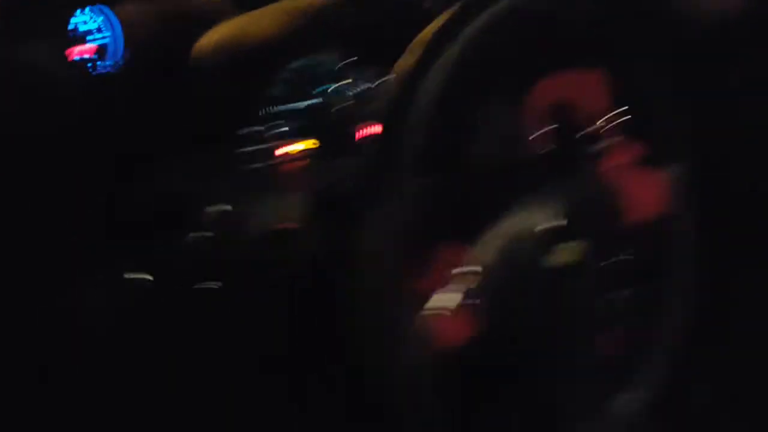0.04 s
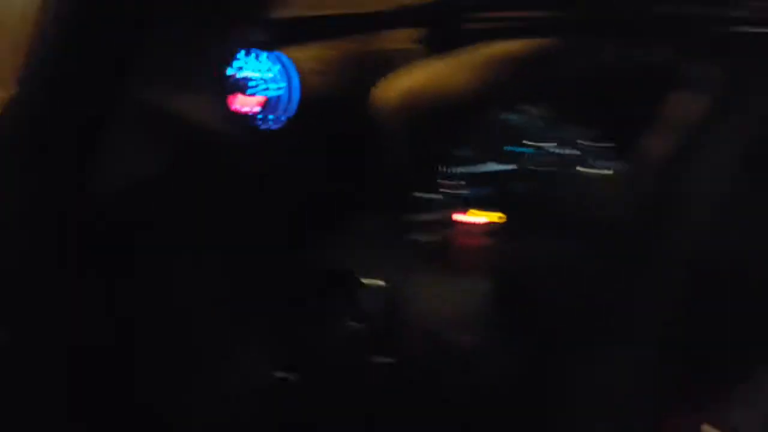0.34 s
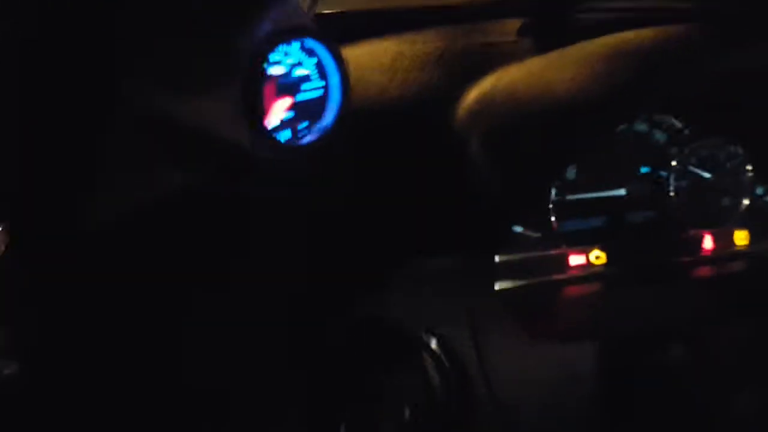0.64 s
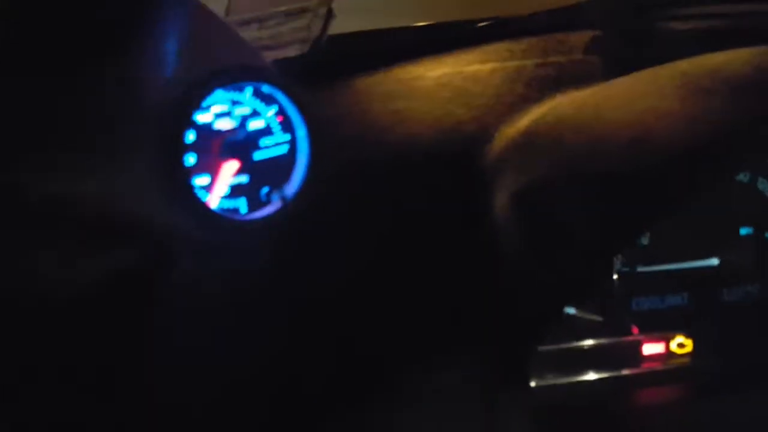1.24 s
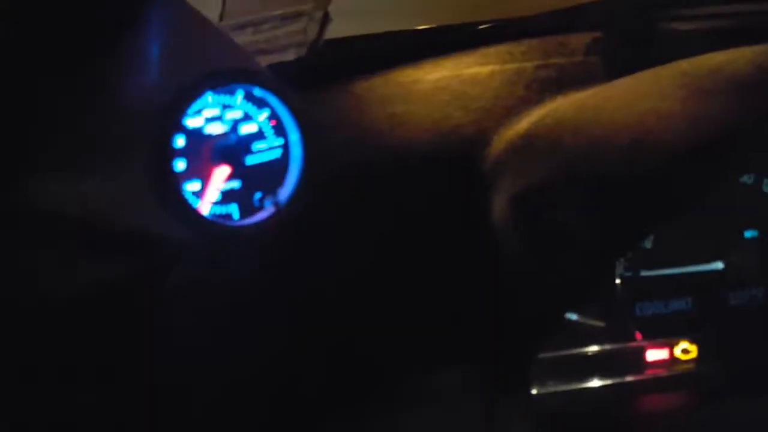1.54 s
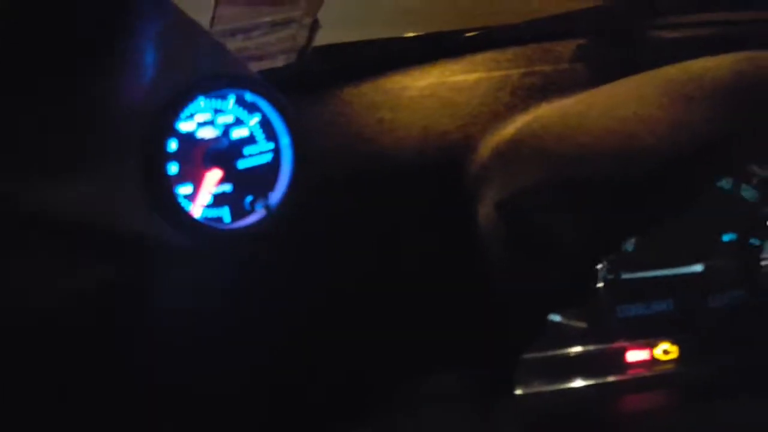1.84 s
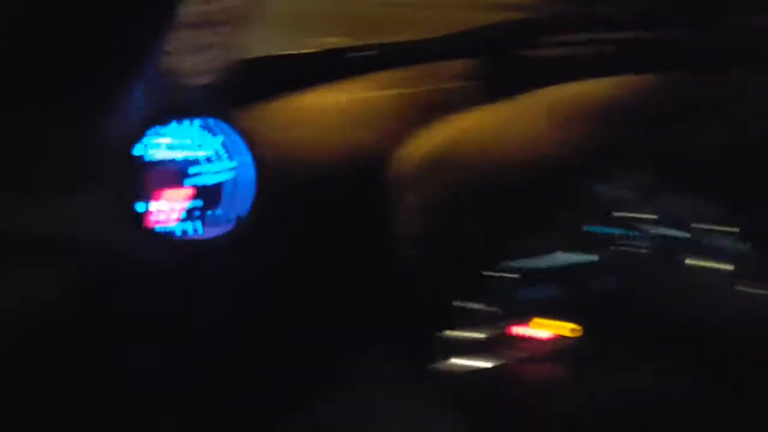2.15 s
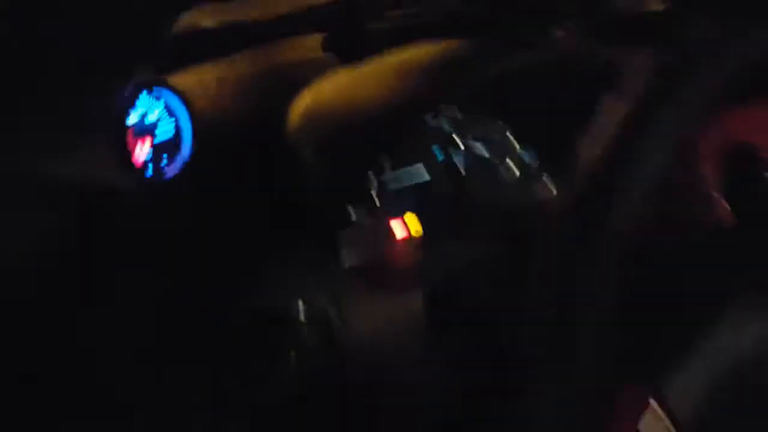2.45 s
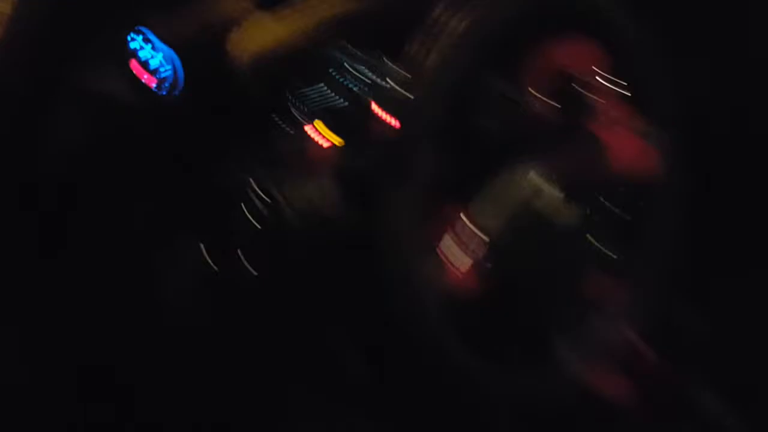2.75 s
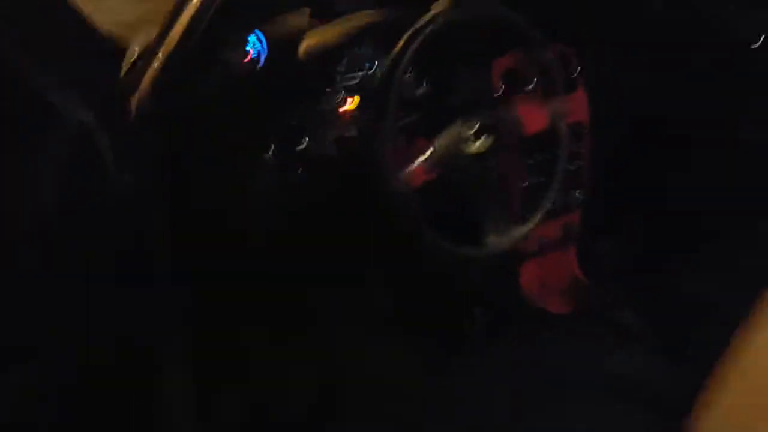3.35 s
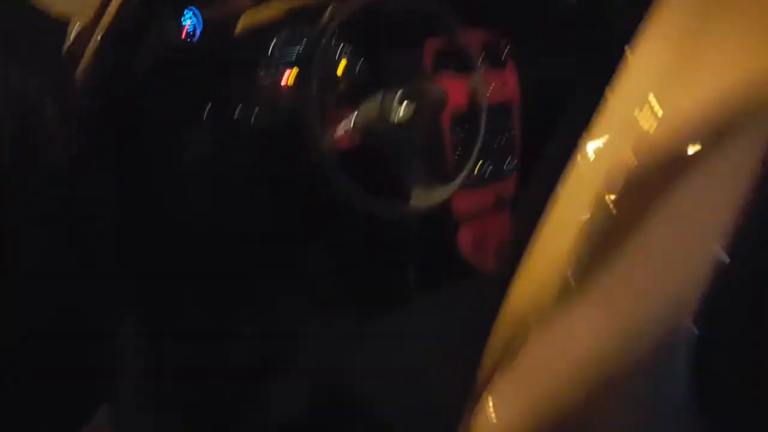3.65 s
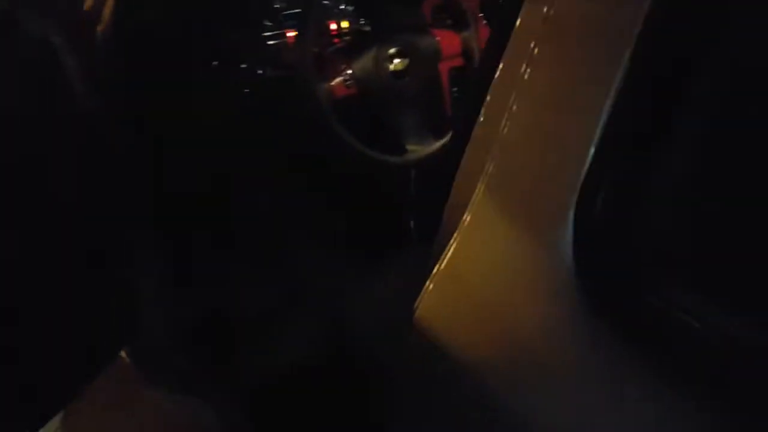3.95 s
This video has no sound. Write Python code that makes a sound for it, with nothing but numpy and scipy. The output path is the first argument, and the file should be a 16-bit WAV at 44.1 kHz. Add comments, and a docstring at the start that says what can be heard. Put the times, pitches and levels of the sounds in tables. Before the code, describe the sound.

An idling car drones low and steady, with a few faint handling ticks close by.

```python
"""A car idles, heard from a handheld microphone. Throughout, each exhaust puff thumps and sets the
cabin booming, differently at each place; the pipe rasps, the engine whirrs and hisses, the hand ticks.
Up to 1.4 s the microphone leans in to the dashboard. At 2.4 s plastic clicks on the right,
then the grip squeaks. From 2.9 s the microphone backs out through the open door and the rumble grows."""
import sys
import numpy as np
from scipy import signal
from scipy.fft import rfft, irfft
from scipy.io import wavfile

SR = 44100
rng = np.random.default_rng(int(sys.argv[2]) if len(sys.argv) > 2 else 0)


def store_wav(level_fs):
    """Save 16-bit WAV to argv[1]."""
    pcm = np.round(np.clip(np.atleast_2d(level_fs), -1, 1) * 32767)
    wavfile.write(sys.argv[1], SR, pcm.T.astype(np.int16))


N = 176400
T = np.arange(N) / SR

# idle speed: t/s, firing rate/Hz
FIRING_RATE = [(0.0, 33.81), (0.25, 34.14), (0.42, 33.62), (0.6, 34.42), (0.74, 33.74), (0.88, 34.51),
               (1.2, 33.64), (1.8, 32.52), (2.2, 32.38), (2.36, 33.21), (2.9, 32.5), (3.33, 32.14),
               (3.55, 30.98), (3.97, 32.27)]
# microphone path: t/s, place (0 dashboard, 1 seat, 2 door)
MIC_PATH = [(0, 0.45), (.7, 0.17), (1.4, 0), (2.4, 0.11), (2.9, 0.49), (3.3, 1.84), (3.8, 2.1)]

# handling ticks: t/s, level/dB, t60/s, tilt/(dB/octave), pan L-R/dB
TICKS = [(0.199, -42, .15, 1, 4), (1.001, -41.5, .03, 3, -4), (1.3749, -32.5, 0.016, 3.5, -4),
         (1.835, -41.5, 0.1, 2, 0), (1.8592, -38, 0.069, 3, -8), (1.8728, -37, .03, 7, 4),
         (1.8916, -33.5, 0.039, 4.5, -6), (2.172, -31.5, 0.022, 1, -22), (2.216, -49, 0.16, 7, -8),
         (2.619, -36.5, 0.017, 3, -10), (3.374, -37.5, 0.018, -1, 1), (3.5646, -37.5, 0.046, 1.5, 8),
         (3.59, -38, .03, -1, 9), (3.632, -36.5, 0.14, -4.5, 9), (3.8931, -32, 0.012, 1.5, 1)]
# soft knocks: t/s, peak/dB
KNOCKS = [(2.172, -36), (3.518, -31)]
# grip squeaks: t/s, length/s, f/Hz, fundamental/dB, octave/dB
SQUEAKS = [(2.52, 0.046, 6900, -76, -67), (2.58, .025, 7260, -64, -55), (2.612, .04, 7550, -64, -52),
           (2.677, .042, 6300, -51, -52), (2.732, 0.031, 5800, -50, -54.5), (2.778, .014, 6300, -53, -49.5),
           (2.69, 0.15, 5730, -74, -64), (2.85, .016, 6200, -65, -66)]
# plastic modes: f/Hz, width/Hz, relative level/dB
CLICK_MODES = [(1400, 300, -21), (2300, 700, -22), (3500, 1300, -19), (5200, 1300, -20), (7400, 1000, -24)]

# noise spectra: f/Hz, relative density/dB
TICK_SPECTRUM = [(600, -13), (1500, 5), (3000, 3), (4800, -8.5), (7000, 1), (8300, -5), (9800, -20),
                 (12700, -9.5), (15500, -16.5)]
WHIRR_SPECTRUM = [(500, -21), (850, -1), (1200, 1), (1450, -3), (1750, -0.5), (2150, -0.5), (2700, -5),
                  (3400, -12), (5000, -26.5)]
HISS_SPECTRUM = [(2200, -21.5), (3300, -0.5), (4100, -0.5), (5000, -2), (5800, -0.5), (7000, -9),
                 (9000, -47)]
TREBLE_SPECTRUM = [(4500, -23.5), (6400, 2.5), (7400, 2), (8300, 0.5), (9000, -6.5), (9700, -31.5),
                   (11000, -29), (12300, -11.5), (14000, -16.5), (15500, -12.5)]
RUMBLE_SPECTRUM = [(15, -16), (28, -18), (40, -11), (50, -7), (62, 6), (90, 7.5), (170, -5.5), (230, -13.5),
                   (280, 1), (380, -18.5), (600, -59)]
RASP_SPECTRUM = [(200, -13), (340, 2), (480, -2.5), (650, -9.5), (900, -13.5), (1300, -27), (2500, -41.5)]

# layer envelopes: t/s, level/dB
HUM_LEVEL = [(0, -46.5), (.6, -49.5), (1.4, -41), (1.8, -51), (2.6, -58.5), (4, -51)]
SHAKE_LEVEL = [(0, -34), (1.2, -48), (2.3, -43.5), (2.9, -40), (3.3, -41.5), (4, -43)]
RUMBLE_LEVEL = [(0, -38), (.9, -39.5), (2, -40), (2.8, -38.5), (3.2, -34), (4, -32.5)]
RASP_LEVEL = [(0, -41), (.5, -44.5), (1, -44.5), (2, -43), (2.8, -39.5), (3.25, -44.5), (3.6, -43.5),
              (4, -43.5)]
BURBLE_LEVEL = [(0, -25), (1.2, -28), (2.4, -27.5), (2.9, -32.5), (3.1, -28.5), (3.4, -26), (3.9, -24.5)]
# engine noise: t/s, whirr/dB, hiss/dB, treble/dB, hiss pan L-R/dB
ENGINE_LEVELS = [(0, -45.5, -56, -53.5, -6), (.1, -52.5, -59, -59, -2), (.19, -47.5, -56, -57.5, -3.5),
                 (.3, -50, -57.5, -56, -6), (1, -52, -57, -56, -6), (2, -53, -58, -57.5, -6.5),
                 (2.2, -50, -59, -56, -6.5), (2.4, -51, -56, -58.5, -9.5), (2.75, -51.5, -54.5, -57, -12),
                 (3.25, -51, -53, -59, -6), (3.45, -51.5, -59.5, -59, 2), (3.7, -50.5, -56, -60, -7),
                 (3.8, -51, -60.5, -63, 1), (4, -53, -59, -61, 3)]

# belt drive whines: f/Hz, width/Hz, level/dB
BELT_WHINES = [(1150, 20, -60.5), (1264, 24, -64), (1473, 26, -63.5), (1564, 55, -71.5), (1890, 90, -66),
               (2092, 35, -64.5), (2310, 40, -69), (2986, 31, -61.5), (4195, 21, -68.5)]
# pipe and panel rings: f/Hz, width/Hz, level/dB at dashboard, seat, door
PIPE_MODES = [(311.6, 7.6, -38.5, -36, -39), (403.5, 8.6, -48.5, -50.5, -52), (452.4, 10, -55, -46, -56),
              (494, 16, -60.5, -58.5, -64), (543, 8.8, -55, -44, -58.5), (597.8, 9.2, -54, -55, -50),
              (674.6, 4.8, -62, -64, -62), (777, 35, -57, -62, -60.5), (833, 23, -57, -65, -59)]
# cabin resonances: f/Hz, width/Hz, signed coupling at dashboard, seat, door
CABIN_MODES = [(63.5, 18, -0.42, -0.68, 0.3), (137, 7.8, -0.059, 0.41, 0.19),
               (170.8, 58.6, -0.43, 0.17, 0.59), (192, 19, -0.7, 0.43, -1.185),
               (203.2, 24.9, 1.135, -.07, 0.072), (257.4, 17.3, 0.68, -0.023, 0.51)]


def from_db(db):
    """Decibels to gain."""
    return 10 ** (np.asarray(db) / 20)


def unit_rms(x):
    """Scale to rms 1."""
    return x / np.sqrt(np.mean(x ** 2) + 1e-20)


def curves(rows):
    """Each column after t/s, interpolated to every sample."""
    times_s, *columns = np.transpose(rows)
    return [np.interp(T, times_s, column) for column in columns]


def panned(x, pan_db):
    """Left over right by pan_db; mid unchanged."""
    gains = from_db(np.array([[.5], [-.5]]) * pan_db)
    return x * gains / gains.mean(0)


def resonate(x, hz, width_hz):
    """Two-pole resonance, peak gain 1."""
    r = np.exp(-np.pi * width_hz / SR)
    poles = [1, -2 * r * np.cos(2 * np.pi * hz / SR), r * r]
    return signal.lfilter(np.array([1, 0, -1]) * (1 - r * r) / 2, poles, x + 1e-18)


def struck(hits, hz, width_hz):
    """Damped mode; a unit impulse rings at an amplitude near 1."""
    return resonate(hits, hz, width_hz) * SR / (2 * np.pi * width_hz)


def noise(spectrum, tilt_db_per_oct=0, size=N):
    """Shaped noise, rms 1."""
    octave = np.log2(np.arange(size // 2 + 1) * SR / size + 1)
    hz, db = np.transpose(spectrum)
    shape_db = np.interp(octave, np.log2(hz), db) + tilt_db_per_oct * octave
    return unit_rms(irfft(rfft(rng.standard_normal(size)) * from_db(shape_db), size))


def wide_noise(spectrum, side_db):
    """Mid/side stereo noise."""
    return noise(spectrum) + from_db(side_db) * noise(spectrum) * np.array([[1], [-1]])


def cyclic_noise(spectrum, firings, repeat_share, side_db):
    """Stereo noise; a share of its power repeats every second firing."""
    cycle_s = .061
    size = int(cycle_s * SR)
    grid = np.arange(size) / size
    mid, side = [np.interp(firings / 2, grid, noise(spectrum, size=size), period=1) for _ in range(2)]
    repeating = mid + from_db(side_db) * side * np.array([[1], [-1]])
    return np.sqrt(repeat_share) * repeating + np.sqrt(1 - repeat_share) * wide_noise(spectrum, side_db)


def drift(rate_hz):
    """Low-passed random wander, rms 1."""
    r = np.exp(-2 * np.pi * rate_hz / SR)
    return unit_rms(signal.lfilter([1], [1, -2 * r, r * r], rng.standard_normal(N + SR))[SR:])


def impulses(times_s, strengths):
    """One impulse at each time."""
    out = np.zeros(N)
    out[np.clip((times_s * SR).astype(int), 0, N - 1)] = strengths
    return out


def puffs(times_s, strengths, width_ms):
    """A pressure hump between two dips at each time."""
    u = np.arange(-SR // 20, SR // 20 + 1) / SR * 1000 / width_ms
    return signal.fftconvolve(impulses(times_s, strengths), (1 - u * u) * np.exp(-u * u / 2), "same")


def hand_ticks():
    """The hand ticks on the microphone: decaying noise bursts."""
    out = np.zeros((2, N))
    age_s = T[:SR // 5]
    for start_s, db, t60_s, tilt_db_per_oct, pan_db in TICKS:
        start = int(start_s * SR)
        tick = from_db(db - 4 - 60 * age_s / t60_s) * noise(TICK_SPECTRUM, tilt_db_per_oct, len(age_s))
        out[:, start:start + len(age_s)] += panned(tick, pan_db)[:, :N - start]
    return out


def hand_knocks():
    """Soft knocks ring one damped mode."""
    times_s, peak_db = np.transpose(KNOCKS)
    return struck(impulses(times_s, from_db(peak_db)), hz=615, width_hz=130)


def grip_squeaks():
    """Stick-slip: a wavering tone and its octave."""
    out = np.zeros(N)
    rad_per_hz = 2 * np.pi * np.cumsum(1 + .024 * drift(1200)) / SR
    for start_s, length_s, hz, fundamental_db, octave_db in SQUEAKS:
        on = (T > start_s) & (T < start_s + length_s)
        swell = np.sqrt(2 * np.abs(np.sin(np.pi * (T[on] - start_s) / length_s)))
        phase = hz * rad_per_hz[on]
        tone = from_db(fundamental_db) * np.sin(phase) + from_db(octave_db) * np.sin(2 * phase)
        out[on] += swell * tone
    return panned(out, pan_db=15)


def plastic_click():
    """One snap into heavily damped modes, close on the right."""
    hit = impulses(times_s=np.array([2.3703]), strengths=.6)
    snap = sum(from_db(db) * struck(hit, hz, width_hz) for hz, width_hz, db in CLICK_MODES)
    return panned(signal.sosfilt(signal.butter(8, 8600, fs=SR, output="sos"), snap), pan_db=-14)


def engine_noise(firings):
    """Valve gear whirrs in step with the firings, the belt drive whines, the intake hisses."""
    whirr_db, hiss_db, treble_db, pan_db = curves(ENGINE_LEVELS)
    throb_db = 1.1 * np.cos(2 * np.pi * firings) + 1.4 * drift(36)
    whirr = cyclic_noise(WHIRR_SPECTRUM, firings, repeat_share=.45, side_db=.6)
    whirr *= from_db(whirr_db + throb_db)
    whines = sum(from_db(db) * unit_rms(resonate(rng.standard_normal((2, N)), hz, width_hz))
                 for hz, width_hz, db in BELT_WHINES)
    hiss = from_db(hiss_db + drift(30)) * wide_noise(HISS_SPECTRUM, side_db=.5)
    treble = from_db(treble_db + 1.3 * drift(30)) * wide_noise(TREBLE_SPECTRUM, side_db=.7)
    flicker = from_db(.55 * drift(12))
    return flicker * (panned(whirr + whines, -1.5) + panned(hiss, pan_db) + panned(treble, .52 * pan_db))


def pipe_tone(firings):
    """The exhaust pipe sings a clean tone at 12 times the firing rate."""
    return panned(from_db(curves(HUM_LEVEL)[0]) * np.sin(2 * np.pi * 12 * firings), pan_db=4)


def body_shake(firings):
    """Uneven firing shakes the body: a wavering note at 1.5 times the firing rate."""
    note = (1 + .5 * drift(6)) * np.sin(2 * np.pi * 1.5 * firings + .5 * drift(5))
    return panned(from_db(curves(SHAKE_LEVEL)[0]) * unit_rms(note), pan_db=2)


def gas_noise(firings):
    """Exhaust gas: low rumble, and a rasp that swells once per firing."""
    rumble = from_db(curves(RUMBLE_LEVEL)[0]) * wide_noise(RUMBLE_SPECTRUM, side_db=-20)
    rasp_db = curves(RASP_LEVEL)[0] + 1.6 * np.cos(2 * np.pi * (firings + .08))
    rasp = from_db(rasp_db) * cyclic_noise(RASP_SPECTRUM, firings, repeat_share=.3, side_db=-4.5)
    return panned(rumble, pan_db=1.8) + panned(rasp, pan_db=5.5)


def pipe_rings(times_s, lope, place):
    """Alternately strong and weak kicks ring the pipe and panels."""
    out = np.zeros(N)
    for hz, width_hz, *levels_db in PIPE_MODES:
        kicks = impulses(times_s, 1 + 1.1 * lope + .25 * rng.standard_normal(len(times_s)))
        ring = resonate(resonate(kicks, hz, width_hz), hz, width_hz=110)
        out += from_db(np.interp(place, [0, 1, 2], levels_db)) * unit_rms(ring)
    return out


def silencer_burble(times_s, strengths, hz=239.7, width_hz=48.4):
    """Unequal cylinders ring the silencer at half the firing rate."""
    drive = puffs(times_s, strengths, width_ms=1.47)
    burble = resonate(resonate(drive, hz, width_hz), hz, width_hz)
    return from_db(curves(BURBLE_LEVEL)[0]) * unit_rms(burble)


def cabin_boom(times_s, strengths, place, lag_ms=1.23, sway_db=.7):
    """Puffs drive the cabin modes; coupling depends on the microphone's place."""
    drive = puffs(times_s + lag_ms / 1000, strengths, width_ms=1.47)
    out = np.zeros(N)
    for hz, width_hz, *couplings in CABIN_MODES:
        gain = np.interp(place, [0, 1, 2], couplings) * from_db(sway_db * drift(3.2))
        out += gain * resonate(drive, hz, width_hz)
    return out


def exhaust(firings, jitter_ms=.06, lope_ms=.09, low_cut_hz=40.5, left_lag_ms=.35):
    """One puff per firing: direct thump, cabin boom, silencer burble, pipe rings."""
    index = np.arange(int(firings[-1]) + 1)
    lope = (-1.) ** index
    time_scatter, thump_scatter, boom_scatter, burble_scatter = rng.standard_normal((len(index), 4)).T
    times_s = np.interp(index, firings, T) + (jitter_ms * time_scatter - lope_ms * lope) / 1000
    place, = curves(MIC_PATH)
    out = .45 * puffs(times_s, 1 + .03 * thump_scatter, width_ms=1.77)
    out += cabin_boom(times_s, 1 + .14 * boom_scatter, place)
    out += silencer_burble(times_s, lope + .45 * burble_scatter)
    out += pipe_rings(times_s, lope, place)
    low_cut = signal.butter(3, low_cut_hz, "high", fs=SR, output="sos")
    out = signal.sosfiltfilt(low_cut, out, padlen=SR // 10)
    shift_s = left_lag_ms / 1000 / 2
    stereo = np.array([np.interp(T - shift_s, T, out), np.interp(T + shift_s, T, out)])
    return panned(stereo, pan_db=2.5)


def scene():
    """The car, timed by the running count of firings, plus handling sounds."""
    firings = np.cumsum(curves(FIRING_RATE)[0]) / SR - .399
    car = exhaust(firings) + body_shake(firings) + pipe_tone(firings)
    car += gas_noise(firings) + engine_noise(firings)
    return car + hand_ticks() + hand_knocks() + grip_squeaks() + plastic_click()


def record(dry, cutoff_hz=15950):
    """Steep low-pass."""
    return signal.sosfilt(signal.ellip(12, .1, 90, cutoff_hz, fs=SR, output="sos"), dry)


dry = scene()
out = record(dry)
store_wav(out)
```